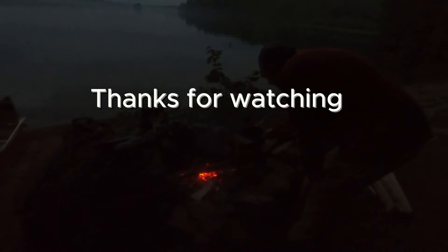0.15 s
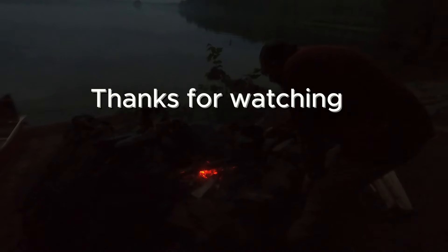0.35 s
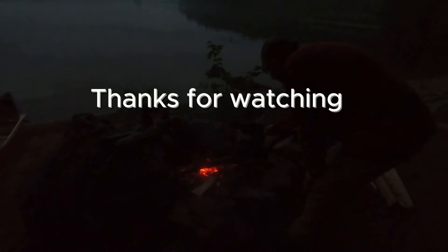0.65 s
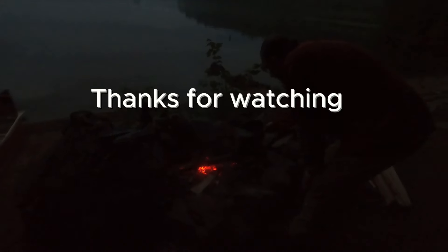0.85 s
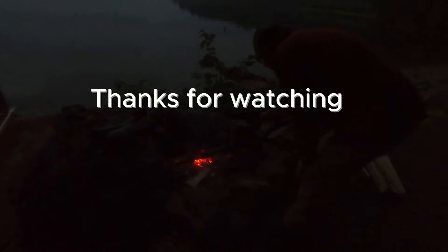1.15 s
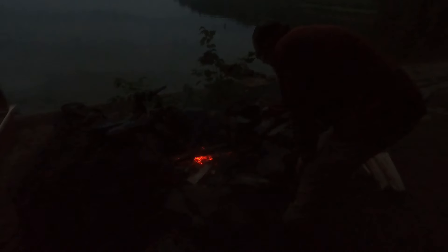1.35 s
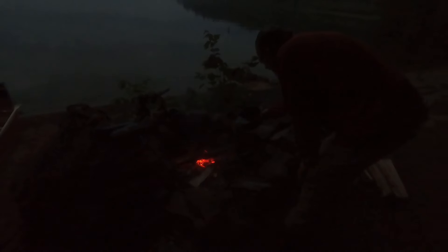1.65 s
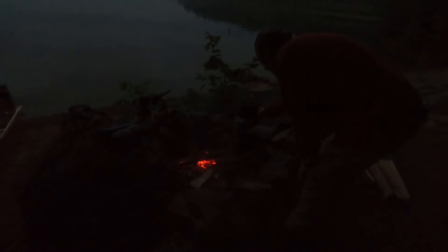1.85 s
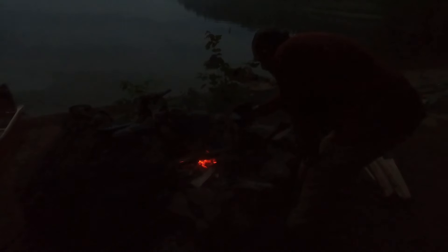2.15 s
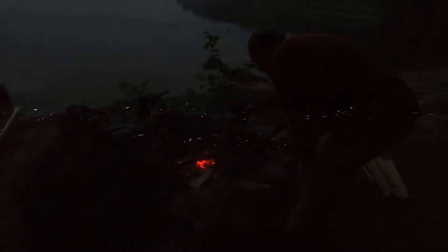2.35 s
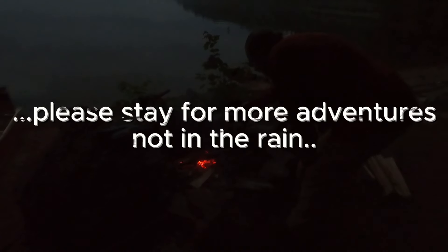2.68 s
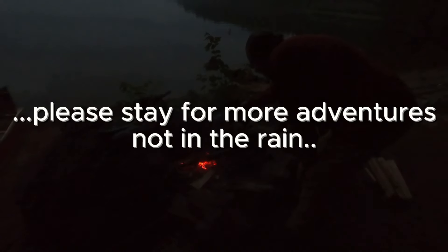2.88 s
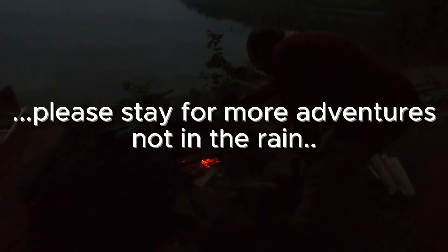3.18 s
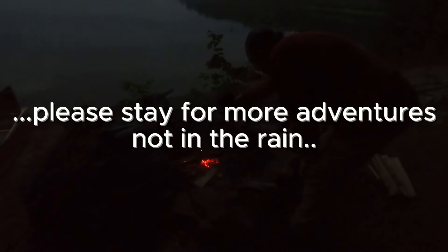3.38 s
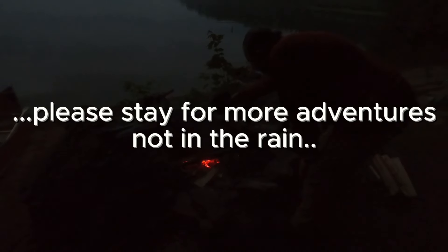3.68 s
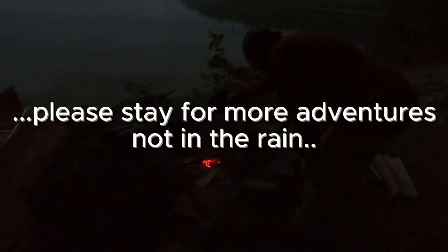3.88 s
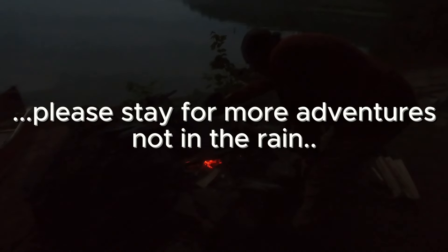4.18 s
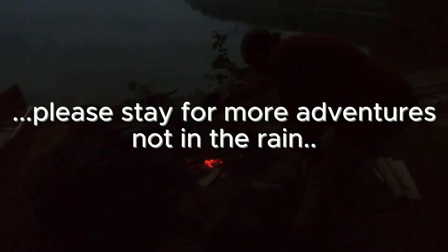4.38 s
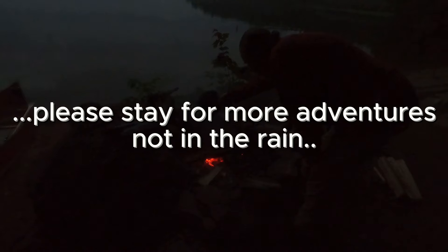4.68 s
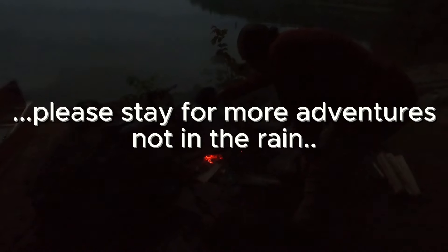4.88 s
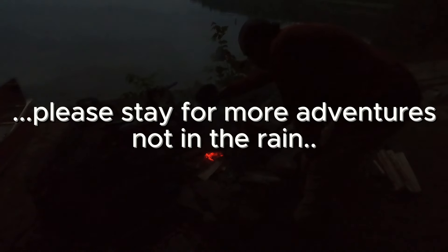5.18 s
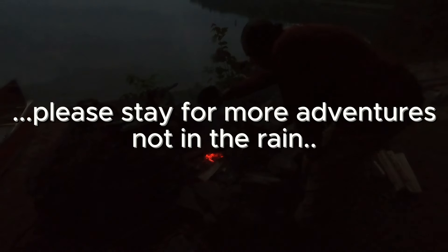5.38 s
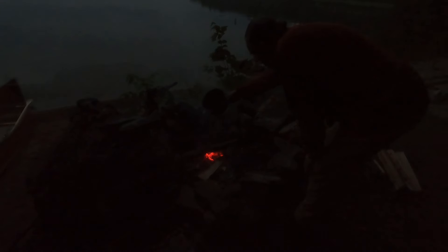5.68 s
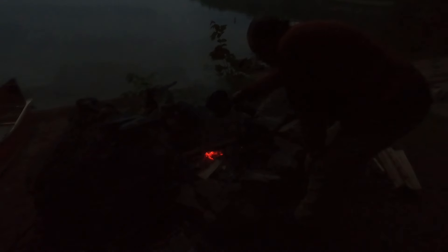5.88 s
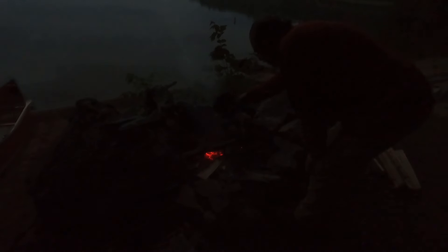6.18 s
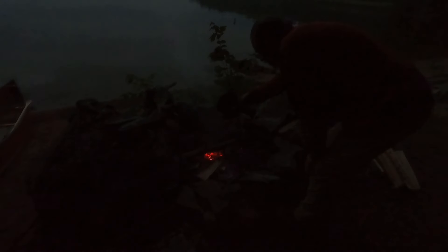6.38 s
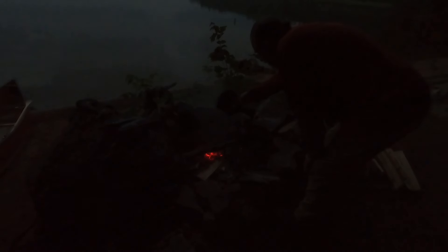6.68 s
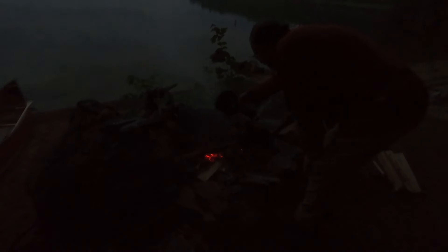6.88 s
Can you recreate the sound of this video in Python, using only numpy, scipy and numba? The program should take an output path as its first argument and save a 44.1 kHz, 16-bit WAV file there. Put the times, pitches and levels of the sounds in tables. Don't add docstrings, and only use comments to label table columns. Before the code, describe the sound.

After a faint sputter of stray drops, water hits campfire embers and they hiss, sizzle and boil wetly, with sharp coal cracks and late gurgles.

```python
import sys
import numpy as np
from scipy import signal
from scipy.fft import rfft, irfft
from scipy.io import wavfile
from scipy.ndimage import uniform_filter1d
from numba import njit

SR = 44100
rng = np.random.default_rng(int(sys.argv[2]) if len(sys.argv) > 2 else 0)


def invert_db(level):
    return 10 ** (np.asarray(level, dtype=float) / 20)


def to_wav(sig):
    pcm = np.clip(np.atleast_2d(sig), -1, 1) * 32767
    pcm = np.round(pcm).astype(np.int16)
    wavfile.write(sys.argv[1], SR, pcm.T)


N = 310464


def on_log(table, hz):
    f, value = np.transpose(table)
    return np.interp(np.log(np.maximum(hz, 1)), np.log(np.maximum(f, 1)), value)


def coloured(table):
    gain = invert_db(on_log(table, np.fft.rfftfreq(N, 1 / SR)))
    return gain / np.sqrt(2 * np.sum(gain ** 2) / N)


def walk(rate):
    hold = int(SR / rate)
    levels = np.repeat(rng.standard_normal(N // hold + 1), hold)
    smooth = uniform_filter1d(uniform_filter1d(levels, hold), hold)[:N]
    return smooth / smooth.std()


def bursts(events, t):
    s, first_db, second_db, rise, fade = np.transpose(events)[:, :, None]
    shape = np.exp(2 * np.minimum((t - s) / np.abs(rise), (s - t) / np.abs(fade)))
    return invert_db(2 * np.hstack([first_db, second_db])).T @ shape


@njit
def rings(start, hz, cycles, left, right, count):
    out = np.zeros((2, count))
    for g in range(len(start)):
        rate = hz[g] / (cycles[g] * SR)
        turn = np.exp(2j * np.pi * hz[g] / SR - rate)
        z = np.e * rate + 0j
        for i in range(min(count - start[g], int(9 / rate))):
            out[0, start[g] + i] += left[g] * i * z.real
            out[1, start[g] + i] += right[g] * i * z.real
            z *= turn
    return out


# time in seconds, level in dB.
HEAT = [(.672, -3), (.70, -3), (.79, -16), (.86, -3.5), (1.02, -0.5), (1.3, -4), (1.52, -5), (1.69, 3.5),
        (1.87, -3), (1.94, 4.5), (2.8, 4.5), (3.3, 2), (3.75, 6), (4.46, 0), (4.6, -1.5), (5.37, 1.5),
        (6.0, -0.5), (6.55, 3.5), (6.72, -3)]
# crest in seconds, flutter in dB, froth in dB, rise in seconds, fade in seconds.
SLUGS = [(.70, -20, -12, .015, .02), (.875, 7.5, 6.5, 0.043, 0.081), (1.27, -10, -12, .01, .06),
         (1.45, 8.5, -10, 0.077, 0.055), (1.69, 5.5, -3, 0.21, 0.062), (1.96, 19.5, 8, 0.054, 0.069),
         (2.12, 23, 3.5, 0.086, 0.32), (2.46, 16, 6, 0.033, 0.054), (2.76, 6.5, 4, 0.033, 0.33),
         (3.165, 10, 7, 0.052, 0.068), (3.42, 8, 0.5, 0.11, 0.17), (3.78, 5, 2.5, 0.19, 0.036),
         (3.97, 4, 3.5, 0.043, .15), (4.13, 7, 2, 0.064, 0.11), (4.36, 7, 2, 0.02, 0.12),
         (4.71, 11.5, 8, 0.12, 0.11), (5.44, -2, -10, 0.044, 0.17), (5.76, 1, -2, 0.21, 0.075),
         (6.01, 5, 9.5, 0.035, 0.043), (6.17, 8.5, 11, 0.058, 0.044), (6.38, -1, 7.5, 0.077, 0.22),
         (6.55, 14, 15, 0.08, 0.069), (6.82, 10.5, 3.5, 0.026, 0.15)]
# crest in seconds, sizzle in dB, fine steam in dB, rise in seconds, fade in seconds.
SPURTS = [(.72, -9, 15, 0.021, 0.049), (.89, -16, 7, 0.019, 0.24), (1.28, -13, 7, .015, .04),
          (1.53, -5, 5, 0.047, 0.13), (1.8, 6, -8, 0.064, 0.013), (1.94, -10, 16, 0.016, .08),
          (2.04, -12, 11, 0.053, 0.042), (2.68, -6, 1, 0.089, 0.091), (3.05, -8, 0, 0.077, .02),
          (3.15, -9, 4, 0.011, 0.048), (3.42, -11, 6, 0.033, 0.17), (3.79, -4, -5, 0.075, 0.048),
          (4.67, 0, -9, 0.018, 0.058), (4.89, 5.5, 16, 0.05, 0.048), (5.0, 7, 5, 0.064, 0.22),
          (5.63, -14, 8, 0.053, 0.18), (6.07, -15, 8.5, 0.076, 0.046), (6.3, -17, -18, 0.046, 0.079),
          (6.75, -4, 5, .02, 0.038)]
# crest in seconds, sizzle in dB, fine steam in dB, rise in seconds, fade in seconds.
DRIPS = [
    (.02, -16, -17, 0.05, 0.083),
    (.1, -14, -15, 0.034, 0.085),
    (.2, -22, -17, 0.038, 0.072),
    (.43, -20, -11, .015, 0.043),
]
POUR_S = 0.662


def strengths():
    t = np.arange(0, N + 64, 64) / SR
    heat = np.interp(t, *np.transpose(HEAT))
    flutter = -7.5 + 0.46 * heat
    froth = -6.5 + 1.42 * t + 0.27 * heat
    fine_steam = -3.5 + 0 * t
    steady = invert_db(2 * np.array([flutter, froth, heat, fine_steam]))
    wet = steady + np.vstack([bursts(SLUGS, t), bursts(SPURTS, t)])
    dry_db = np.array([-16, -30, -31.5, -35])
    drips = np.pad(bursts(DRIPS, t), ((2, 0), (0, 0)))
    dry = invert_db(2 * dry_db)[:, None] + drips
    power = np.where(t < POUR_S, dry, wet)
    return np.array([np.interp(np.arange(N) / SR, t, 10 * np.log10(p)) for p in power])


# pitch in Hz, then the shares of flutter, froth, sizzle and fine steam (plain numbers).
RULE = [(70, 0.96, 0.98, 0, 0.44), (158, 0.46, 0.57, 0.05, 0.0062), (327, 0.44, 0.36, 0.39, 0),
        (455, 0, 1.17, 0.053, 0.31), (690, 0.052, 1.44, 0, 0.03), (850, 0.22, 0.44, 0, 0.081),
        (1130, 0.023, 0.39, 0.24, 0.06), (1650, 0.074, 0.23, 0.29, 0.028), (2400, 0.073, 0.02, 0.6, 0.0081),
        (4560, 0, 0.057, 0.46, 0.15), (8000, 0.063, 0.049, 0.17, 0.29)]


def shares(hz):
    f, *columns = np.transpose(RULE)
    return np.array([on_log(list(zip(f, c)), hz) for c in columns])


# pitch in Hz, level in dB per Hz.
STEAM = [(25, -46), (120, -21.5), (152, -4), (310, -7), (420, -21), (850, -15), (1050, -6), (3400, -3),
         (4200, -5.5), (5400, -6), (6800, -10), (9000, -10.5), (13500, -20.5), (15600, -42)]
# pitch in Hz, shared part from 0 to 1.
LIKENESS = [(40, 0.5), (200, 0.77), (700, 0.95), (1400, 0.93), (3000, 0.99), (7000, 0.7), (9000, 0.7),
            (11000, 0.8), (15000, 0.3)]


def steam(boil_db):
    shared_db, own_db, sputter_db, level_db = 0.0, 0.78, 0.6, -49
    hz, colour, out = np.fft.rfftfreq(N, 1 / SR), coloured(STEAM), 0
    surge, sputter = np.array([walk(28) for _ in boil_db]), walk(150)
    for centre in 25 * 2 ** (np.arange(29) / 3):
        thirds_away = 3 * np.log2(np.maximum(hz, 1) / centre)
        band = colour * np.cos(np.pi / 2 * np.clip(thirds_away, -1, 1))
        common, apart = irfft(rfft(rng.standard_normal((2, N))) * band, N)
        like = np.clip(on_log(LIKENESS, centre), 0, 1)
        db = shares(centre) @ (boil_db + shared_db * surge) + own_db * walk(22)
        db = db + sputter_db * min(centre / 2500, 1) * sputter
        opposite = apart * np.array([[1], [-1]])
        jet = np.sqrt((1 + like) / 2) * common + np.sqrt((1 - like) / 2) * opposite
        out = out + invert_db(db) * jet
    return out * invert_db(level_db)


# time in seconds, bubble level in dB.
GRAIN = [(0, 2.5), (.66, 7), (.75, 1), (.9, 2.5), (1.5, -1.5), (1.62, -2), (1.85, -4.5), (1.92, -7),
         (3, -8), (4.8, 1), (4.87, 4), (5.05, 4.5), (5.27, 2.5), (5.4, 0), (7.04, -4.5)]


def fizz(boil_db, lo_hz, hi_hz, cycles, level_db, spread_db, count):
    when, pitch, size, place = rng.random((count, 4)).T
    start = (when * N).astype(int)
    hz = lo_hz * (hi_hz / lo_hz) ** pitch
    db = np.sum(shares(hz) * boil_db[:, start], axis=0) + on_log(STEAM, hz) + 10 * np.log10(hz / 3000)
    db = db + np.interp(start / SR, *np.transpose(GRAIN)) + 2.5 * walk(35)[start]
    gain = invert_db(level_db + db - spread_db * np.log(1.02 - size))
    left, right = gain * invert_db(2 - 4 * place), gain * invert_db(4 * place - 2)
    return rings(start, hz, np.full(count, cycles), left, right, N)


def thuds(events, cycles, early, level_db):
    s, db, hz = np.transpose(events)
    gain = invert_db(db + level_db)
    start = ((s - early / hz) * SR).astype(int)
    return rings(start, hz, np.full(len(s), cycles), gain, gain, N)


# crest in seconds, peak in dB, pitch in Hz.
BEADS = [(0.7002, -51, 4565), (0.8599, -52, 1780), (0.8722, -50, 3400), (0.8766, -44, 4005),
         (0.9361, -47, 2740), (0.9368, -45, 3520), (1.1059, -41, 2700), (1.1421, -46, 2756),
         (1.1443, -46, 1820), (1.6298, -42, 2885), (1.6356, -43, 5297), (1.7792, -43, 3550),
         (1.9483, -41, 3850), (2.0448, -47, 4392), (2.1087, -47, 2713), (2.6101, -43, 2730),
         (2.7639, -42, 4435), (2.8684, -41, 2730), (2.888, -44, 2700), (2.9083, -45, 4349),
         (2.9199, -40, 4478), (3.1057, -41, 4500), (3.3429, -46, 2700), (3.6608, -45, 2860),
         (3.6978, -43, 2100), (3.7188, -40.5, 3229), (3.7979, -45, 3360), (3.7994, -43, 4823),
         (3.9372, -48, 3832), (3.9409, -45, 2842), (3.9946, -41, 2720), (4.1332, -46, 5727),
         (4.1455, -43, 2196), (4.1477, -43, 3320), (4.1636, -41, 2842), (4.2659, -45, 3875),
         (4.4111, -48, 4823), (4.4147, -48, 1808), (4.4299, -42, 3100), (4.4365, -45, 1808),
         (4.5214, -54, 1679), (4.8762, -45, 2670), (4.8769, -42, 4220), (4.8834, -43, 3531),
         (4.8842, -39, 5211), (4.8929, -39, 3531), (4.8936, -38, 4500), (5.1142, -51, 2282),
         (5.1294, -42, 3640), (5.2651, -40, 3617), (5.3732, -43, 2540), (5.3776, -45, 5167),
         (5.3957, -44, 3789), (5.5097, -42, 3832), (5.6715, -46, 5684), (5.8971, -47, 5727),
         (6.1083, -46, 4608), (6.3833, -45, 1660), (6.4152, -44, 3359), (6.482, -43, 3014)]


def beads():
    return thuds(BEADS, cycles=4.0, early=3.56, level_db=0.5)


def cracks(events, cycles, level_db, partner_db, splinter_db, tail_s):
    s, db, hz, pan_db = np.transpose(events)[:, :, None]
    late, colour = rng.random((len(s), 2, 10)).transpose(1, 0, 2)
    start = 0.0007 + np.hstack([s, s, s + tail_s * late])
    pitch = hz * np.hstack([np.ones_like(s), np.full_like(s, 1.6), 0.663 + 0.76 * colour])
    pitch = np.minimum(pitch.ravel(), 0.3 * SR)
    part_db = db + level_db + np.hstack([0 * s, partner_db + 0 * s, splinter_db - 12 * late])
    left, right = invert_db(part_db + pan_db / 2).ravel(), invert_db(part_db - pan_db / 2).ravel()
    return rings((start.ravel() * SR).astype(int), pitch, np.full(start.size, cycles), left, right, N)


# start in seconds, peak in dB, ring in Hz, left minus right in dB.
CRACKS = [(0.1039, -33, 4160, -1), (0.205, -41, 4160, 0.5), (0.4289, -40, 4050, -1),
          (0.6614, -36, 3180, -2), (0.6903, -48, 3850, -3), (0.7118, -40, 4490, 0.0),
          (0.8021, -38, 4040, 1), (1.0126, -41, 1940, -2), (1.4262, -34, 2020, 0), (1.5454, -28, 2800, 0),
          (1.5972, -35, 3260, -5), (1.8475, -30, 2480, -2), (1.939, -33, 2600, -1),
          (2.6554, -30, 2050, 0.0), (3.1448, -30, 3440, 0.0), (3.477, -42, 2670, -3),
          (4.8642, -28, 2570, 2), (4.999, -42, 3360, 0.0), (5.0185, -35, 3710, 2), (5.035, -27, 3320, -1),
          (5.142, -31, 3080, 0.5), (5.1602, -37, 2980, 5), (5.4941, -29, 3470, 3), (5.997, -33, 1640, 0.0)]
# start in seconds, peak in dB, ring in Hz, left minus right in
# dB.
TICKS = [(0.1032, -40.5, 5730, 1), (0.1905, -42.5, 8300, 1), (0.417, -47, 5690, -2.0),
         (0.4364, -46, 5340, -2.5), (0.6614, -45, 5180, -2), (0.7118, -45, 4260, -0.5),
         (0.8059, -38, 5700, -2.0), (0.8499, -44, 2900, 2), (1.8492, -39, 5430, -2.5),
         (1.9225, -36, 7900, -3), (2.6556, -37, 5420, -2), (3.1452, -42, 5450, 4), (4.6643, -45, 5800, -2),
         (4.8604, -31, 5300, -1.5), (4.999, -40, 5340, 2), (5.0185, -36, 4790, -3), (5.1203, -35, 4890, -3),
         (5.1432, -33, 4850, -1.5), (5.1916, -38, 5310, -1.5), (5.2140, -37, 4930, -2.0),
         (5.2395, -37, 4340, 2), (5.6436, -34.5, 9050, -1), (5.358, -35.5, 4560, 0),
         (5.657, -35.5, 3740, 0)]
# start in seconds, peak in dB, ring in Hz, left minus right in dB.
SNAPS = [(0.1907, -41, 12400, -2), (0.4675, -51, 5900, -1), (0.2044, -46, 8540, -2.5),
         (0.2745, -44, 7700, -2), (0.4634, -52, 8140, -1), (0.7158, -39.5, 8600, -1.5),
         (0.8061, -36, 10700, -2), (0.85, -32, 8000, -2), (1.912, -48, 7950, -4.5),
         (3.1448, -38, 8000, -2.5), (3.3994, -41, 8850, -2.0), (3.7968, -34, 8500, 0),
         (4.3014, -40, 9050, 0.5), (4.6643, -36, 7840, -4.5), (4.909, -45, 9220, -2.5),
         (5.162, -45, 7130, -12), (5.2784, -37, 10000, -2.0), (5.6436, -42, 7900, -2)]
# start in seconds, peak in dB, ring in Hz, left minus right in dB.
POPS = [(0.7214, -30, 5340, -1.5), (0.7304, -37, 4080, -0.5), (1.6125, -32.5, 1870, 2),
        (0.8059, -33, 5600, -2), (1.678, -31, 3100, -4), (1.0132, -36, 2600, -3), (4.8797, -33, 4300, 0),
        (4.9205, -39, 4400, 0), (4.9322, -30, 4000, 0.0), (5.2140, -21.5, 2500, -1),
        (5.2395, -27.5, 4350, 4)]
# start in seconds, peak in dB, ring in Hz, left minus right in dB.
SPARKS = [(0.1291, -54, 8420, 0), (0.383, -55, 8120, 0), (0.405, -52, 8340, 0), (0.4364, -48, 7840, 0),
          (0.5631, -57, 8200, 0), (0.6614, -47, 8420, 0), (0.6903, -44, 8730, 0), (1.0789, -52, 7700, 0),
          (1.1548, -44, 8770, 0), (1.281, -45, 8530, 0), (1.3598, -46, 7820, 0), (1.7654, -37.5, 8740, 0),
          (1.7893, -44, 8370, 0), (1.8203, -41, 9710, 0), (2.3416, -44, 9260, 0), (4.237, -46, 7260, 0),
          (5.0674, -40, 8890, 0), (5.342, -41, 8620, 0), (5.6254, -41, 9670, 0), (5.669, -38, 8700, 0),
          (5.7932, -44, 8000, 0), (6.4767, -44, 7870, 0), (6.4996, -44, 7140, 0), (6.7474, -42, 9820, 0),
          (6.754, -43, 7360, 0), (6.9167, -51, 7320, 0)]


def splitting_coals():
    out = cracks(CRACKS, cycles=1.0, level_db=-3.5, partner_db=-26.0, splinter_db=-13.0, tail_s=0.007)
    out = out + cracks(TICKS, cycles=1.5, level_db=2.0, partner_db=-12.0, splinter_db=-16.0, tail_s=0.006)
    out = out + cracks(SNAPS, cycles=1.6, level_db=3.0, partner_db=-9.0, splinter_db=-12.0, tail_s=0.003)
    out = out + cracks(POPS, cycles=0.55, level_db=-3, partner_db=-6.0, splinter_db=-21.0, tail_s=0.0036)
    return out + cracks(SPARKS, cycles=3.1, level_db=-2.5, partner_db=-6.0, splinter_db=-3.0, tail_s=0.0029)


def crackle(boil_db):
    out = splitting_coals() + beads()
    out = out + fizz(boil_db, lo_hz=1100, hi_hz=12000, cycles=0.78, level_db=-54.5, spread_db=3.5, count=9000)
    out = out + fizz(boil_db, lo_hz=3100, hi_hz=6000, cycles=1.03, level_db=-51, spread_db=3.5, count=3500)
    return signal.sosfilt(signal.butter(2, [700, 11500], "band", fs=SR, output="sos"), out)


# time in seconds, peak in dB, pitch in Hz.
THUDS = [
    (0.889, -54, 94.2),
    (1.938, -54, 106),
    (2.32, -57, 75),
    (3.412, -61, 108),
    (4.729, -57, 78.1),
    (5.56, -59, 75.4),
    (6.16, -48, 94.2),
    (6.54, -41, 96),
    (6.814, -61, 70.0),
]
# time in seconds, peak in dB, pitch in Hz.
GULPS = [(0.88, -52, 154), (1.272, -44.5, 165), (1.913, -43, 190), (3.147, -40.5, 146), (4.723, -57, 184),
         (6.147, -43, 215), (6.363, -39.5, 158), (6.538, -38, 223), (6.599, -40, 158), (6.8, -37, 220),
         (6.825, -36.5, 235)]
# time in seconds, peak in dB, pitch in Hz.
GURGLES = [(1.947, -52, 697), (3.145, -50, 865), (4.706, -46, 616), (6.148, -64, 690), (6.431, -45, 694),
           (6.459, -41, 717), (6.489, -52, 610), (6.509, -52, 660), (6.544, -37, 712), (6.46, -40, 1130),
           (6.53, -37, 1210), (6.575, -39, 1240), (6.571, -42, 760), (6.599, -45, 640)]
# crest in seconds, peak in dB, pitch in Hz.
LUMPS = [(0.865, -57, 183), (0.881, -56, 300), (0.907, -55, 152), (0.972, -56.5, 172), (1.379, -55, 201),
         (1.44, -51, 235), (1.959, -48, 193), (1.995, -49, 155), (2.067, -44, 224), (2.083, -48, 148),
         (2.12, -46.5, 215), (2.239, -49, 193), (2.454, -53, 265), (2.18, -50, 145), (2.3, -51, 160),
         (2.76, -51, 262), (3.171, -48, 268), (3.431, -54, 193), (3.775, -50, 170), (4.117, -55, 179),
         (4.653, -47, 277), (4.706, -48, 274), (4.728, -56, 181), (4.78, -53, 215), (6.441, -50, 186),
         (6.458, -52, 366), (6.523, -63, 473), (6.56, -48, 128), (6.912, -53, 223)]
# crest in seconds, peak in dB, pitch in Hz.
PLOPS = [(0.7002, -46, 1291), (0.7322, -45, 1100), (0.87, -44, 1190), (0.8816, -57, 1090),
         (0.9012, -46, 1270), (1.428, -43, 1291), (1.9258, -40, 1030), (1.9483, -61, 655),
         (2.0078, -43, 1205), (2.0586, -41, 818), (2.1486, -44, 780), (2.1566, -44, 1100),
         (2.5527, -43, 1105), (3.1536, -39, 1100), (3.1623, -48, 825), (3.1956, -45, 1040),
         (3.6528, -40.5, 1050), (4.1324, -52, 695), (4.7115, -46, 570), (4.8646, -46, 1291),
         (5.2151, -44, 1378), (5.9995, -51, 559), (6.1098, -40, 1162), (6.1845, -48, 1119),
         (6.3848, -53, 1040)]


def wet_ash(boil_db):
    out = thuds(THUDS, cycles=0.48, early=0.74, level_db=-7.0)
    out = out + thuds(GULPS, cycles=1.74, early=0.53, level_db=-9.0)
    out = out + thuds(GURGLES, cycles=3.3, early=1.0, level_db=-6.5)
    out = out + thuds(LUMPS, cycles=1.84, early=2.36, level_db=-3.0)
    out = out + thuds(PLOPS, cycles=2.3, early=2.8, level_db=-7.0)
    return out + fizz(boil_db, lo_hz=143.6, hi_hz=946, cycles=1.96, level_db=-51.5, spread_db=1.5, count=700)


# pitch in Hz, width in Hz.
VENTS = [
    (1764, 280),
    (760, 240),
]
# crest in seconds, upper vent in dB, lower vent in dB, rise in seconds, fade in seconds.
SONGS = [
    (.88, 7.5, -8.5, 0.03, 0.95),
    (2.15, -3, 5, 0.12, 0.49),
    (2.85, 3, -29, 0.22, 0.24),
    (4.4, 6.5, -22, 0.61, 0.19),
    (6.52, 4, 3.5, 0.5, 0.18),
    (6.57, -2, 7, 0.11, 0.06),
]


def vents():
    hz, t = np.fft.rfftfreq(N, 1 / SR), np.arange(N) / SR
    shape = np.array([1 / (1 + (2 * (hz - f) / width) ** 2) for f, width in VENTS])
    air = irfft(rfft(rng.standard_normal((2, N))) * shape, N)
    air = air / air.std(axis=1)[:, None]
    song = np.sum(air * np.sqrt(bursts(SONGS, t)), axis=0)
    return invert_db(-64.5) * (t > POUR_S) * song


# pitch in Hz, width in Hz, boost in dB.
RESONANCES = [(634, 77, 4.5), (983, 265, 3), (1630, 120, 1.5), (215, 14, 1), (1990, 240, -2), (4080, 330, -1),
              (5400, 440, 1), (1470, 130, -1.5), (7440, 300, 3)]


def surroundings(bed):
    delay_s, echo_db, dull_hz, turn_cycles = 0.001862, -15, 3170, 0.3
    hz = np.fft.rfftfreq(N, 1 / SR)
    hollows = invert_db(sum(db / (1 + (2 * (hz - f) / width) ** 2) for f, width, db in RESONANCES))
    echo = invert_db(echo_db) * np.exp(-2j * np.pi * (hz * delay_s + turn_cycles)) / (1 + (hz / dull_hz) ** 2)
    return irfft(rfft(bed) * hollows * (1 - echo), N)


# pitch in Hz, level in dB per Hz.
DUSK = [(15, -43), (25, -3), (60, -1), (125, -5), (175, 5), (394, -3.5), (1420, -6.5), (1760, -8),
        (4380, -9), (5570, -4.5), (12400, -12), (14300, -17), (15000, -45)]


def shore():
    return irfft(rfft(rng.standard_normal((2, N))) * coloured(DUSK) * invert_db(-67.5), N)


def scene():
    boil_db = strengths()
    bed = steam(boil_db) + crackle(boil_db) + wet_ash(boil_db) + vents()
    return surroundings(bed) + shore()


def roll_off(x):
    return signal.sosfilt(signal.butter(12, 15800, fs=SR, output="sos"), x)


# pitch in Hz, left minus right in dB.
PORTS = [(60, 0.5), (250, -1), (1000, -1.2), (2400, 0.5), (4400, -0.5), (8000, -2), (15000, -3)]
# pitch in Hz, lag in radians.
PORT_TURN = [(300, 0.2), (1400, 0.28), (3000, 0.72), (5300, 0.81), (7400, 1.72), (8500, 0), (10400, 1.57),
             (14000, 1.5)]


def record(dry):
    hz = np.fft.rfftfreq(N, 1 / SR)
    side = np.array([[1], [-1]]) / 2
    loudness = invert_db(side * on_log(PORTS, hz))
    lag = np.exp(-1j * side * on_log(PORT_TURN, hz))
    ports = loudness * lag / (1 + (hz / 15300) ** 30)
    mix = irfft(rfft(dry) * ports, N)
    return roll_off(mix)


dry = scene()
out = record(dry)
to_wav(out)
```